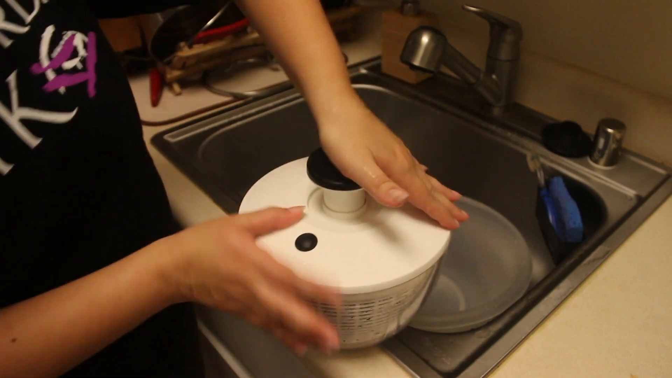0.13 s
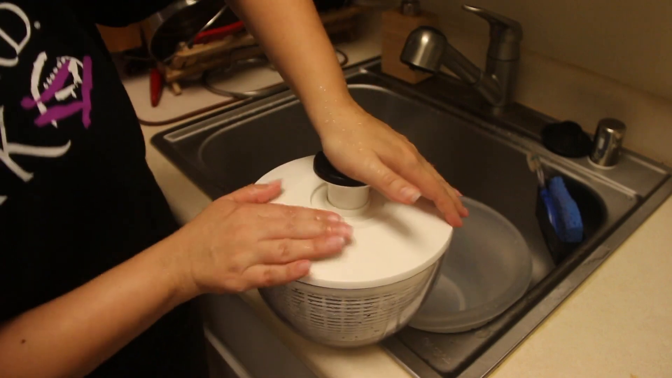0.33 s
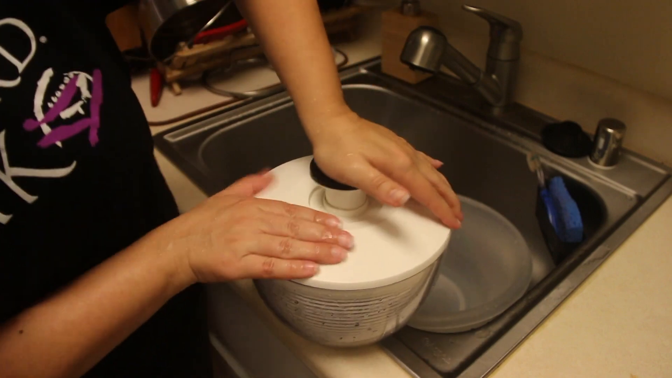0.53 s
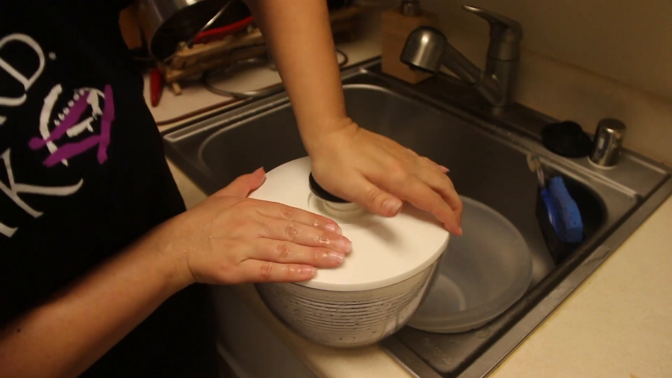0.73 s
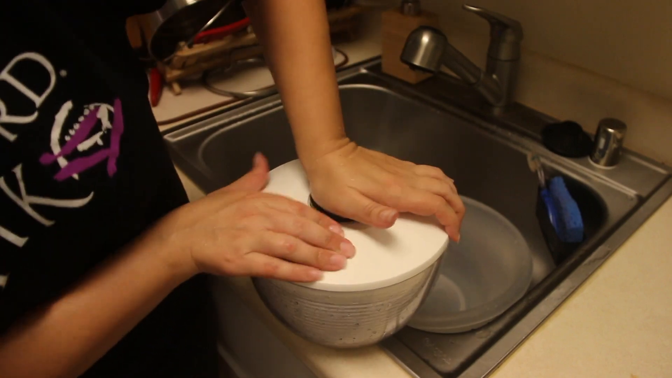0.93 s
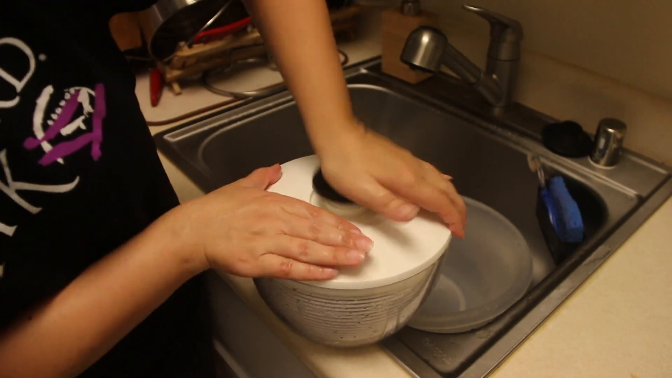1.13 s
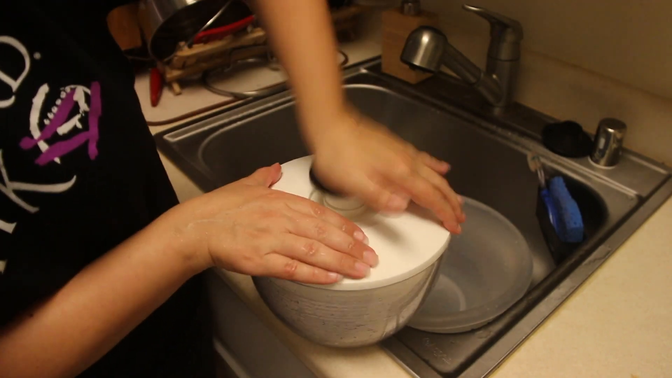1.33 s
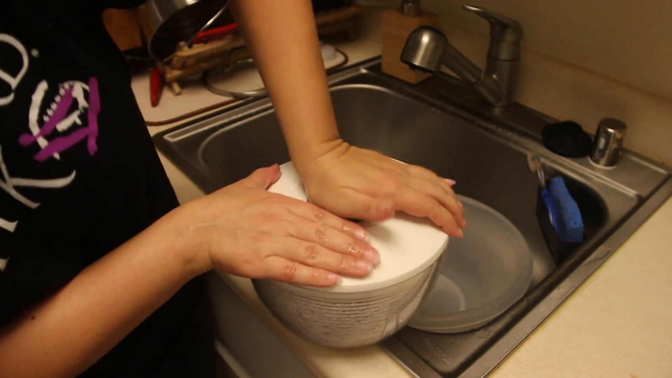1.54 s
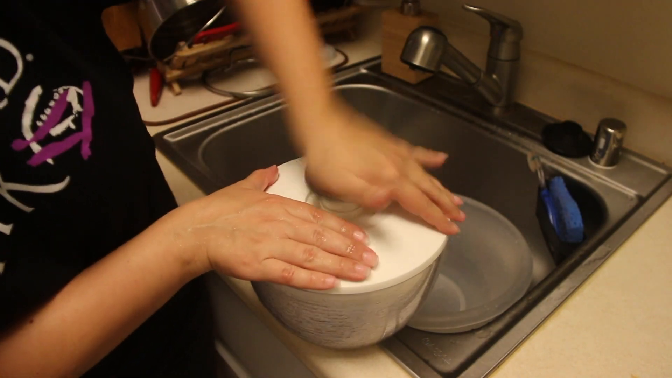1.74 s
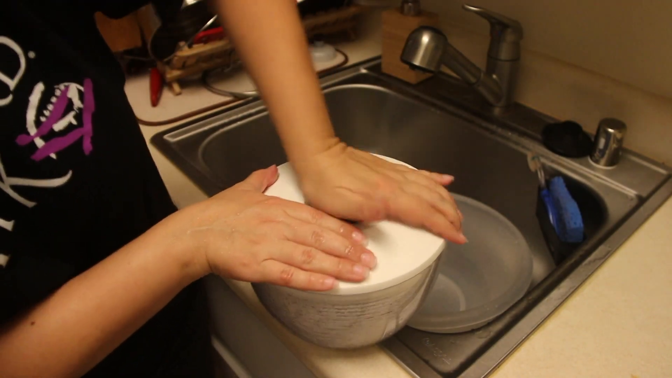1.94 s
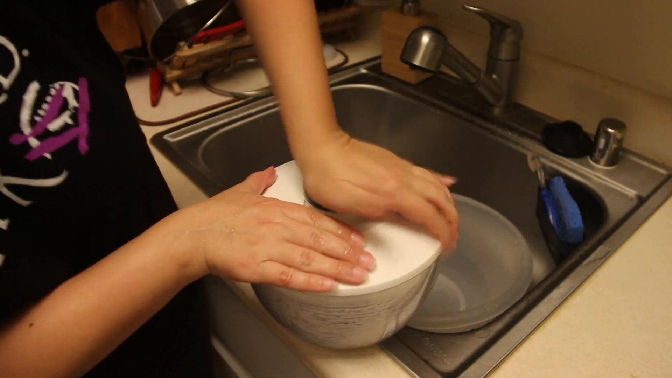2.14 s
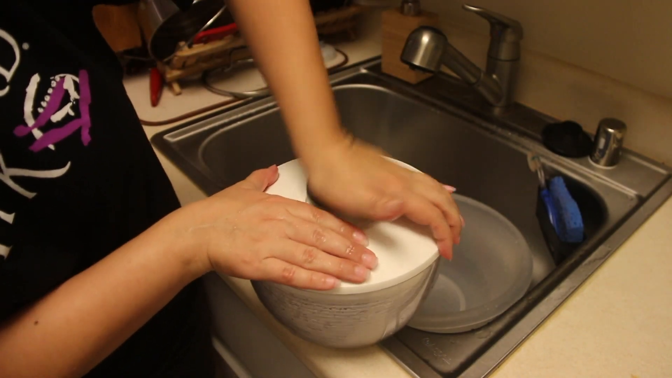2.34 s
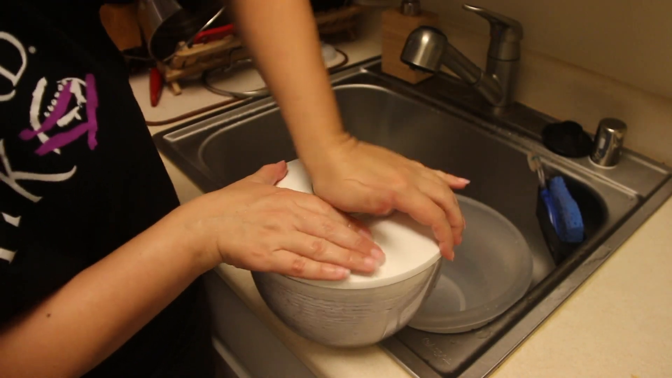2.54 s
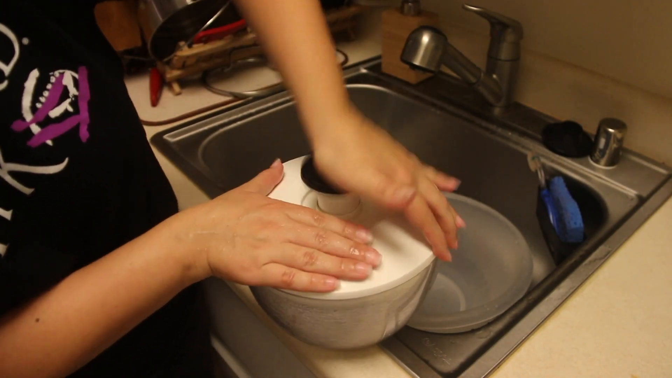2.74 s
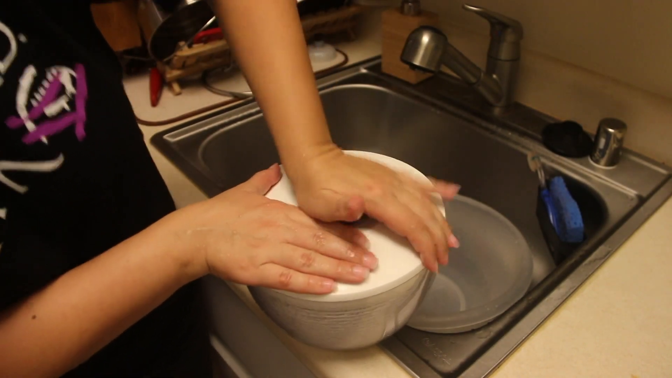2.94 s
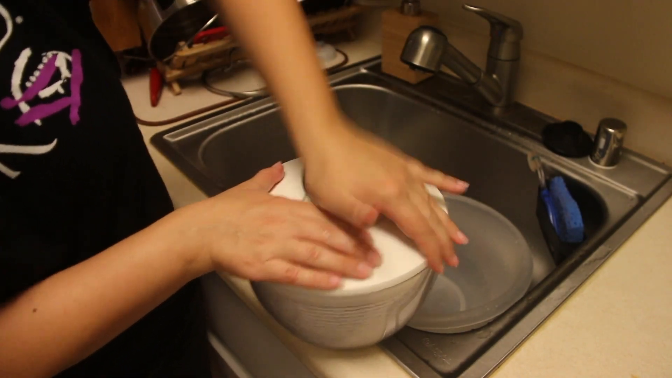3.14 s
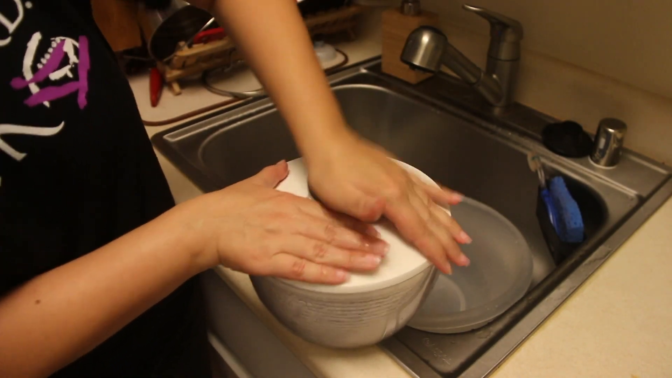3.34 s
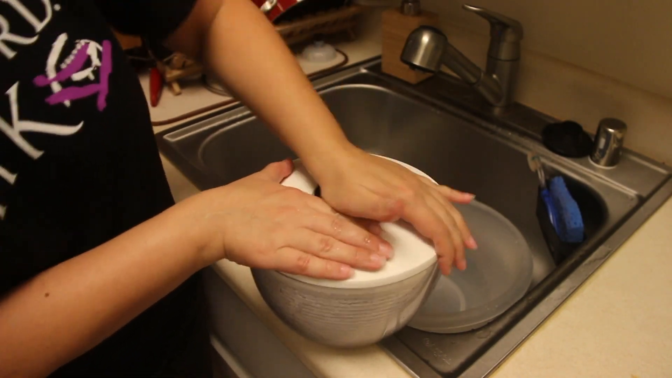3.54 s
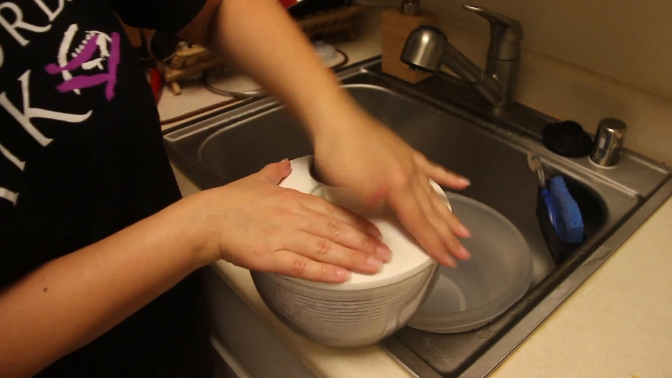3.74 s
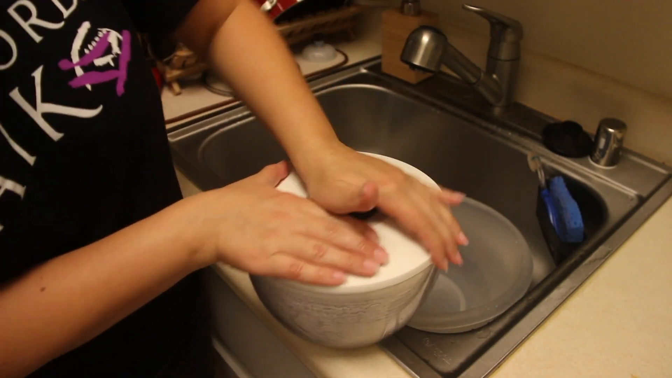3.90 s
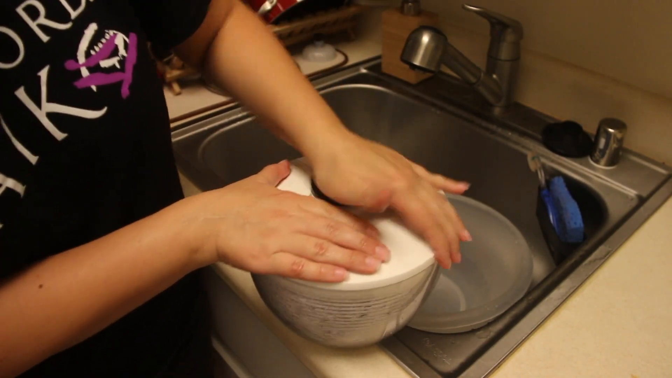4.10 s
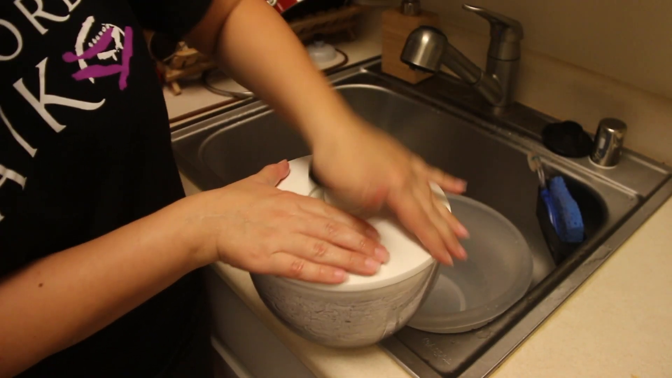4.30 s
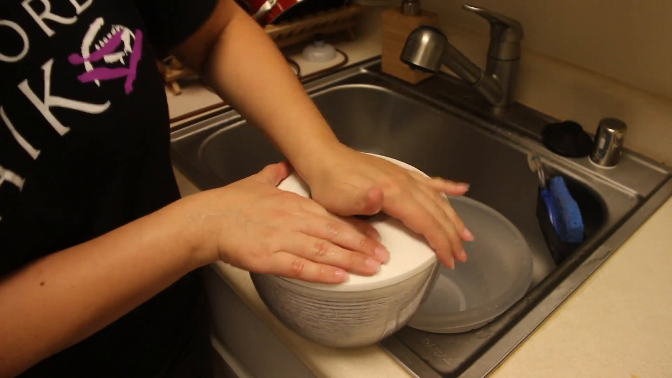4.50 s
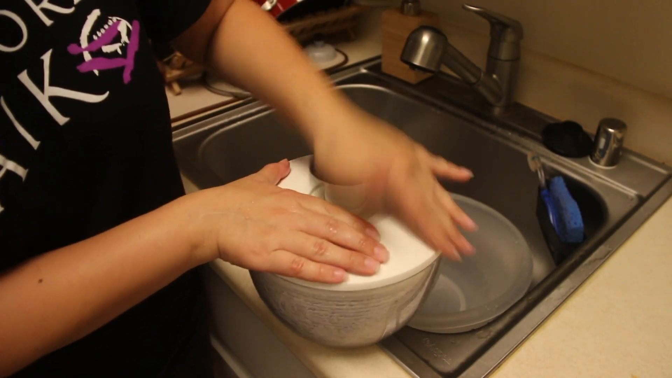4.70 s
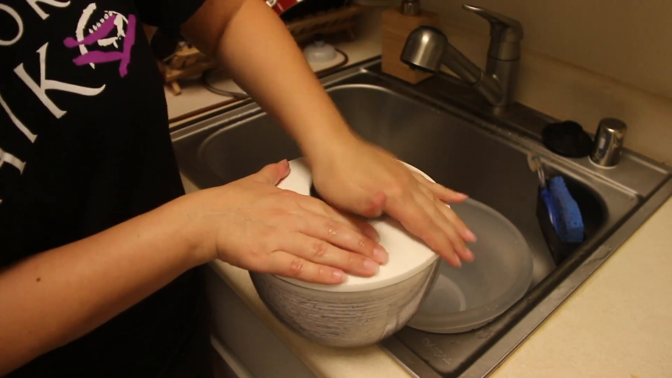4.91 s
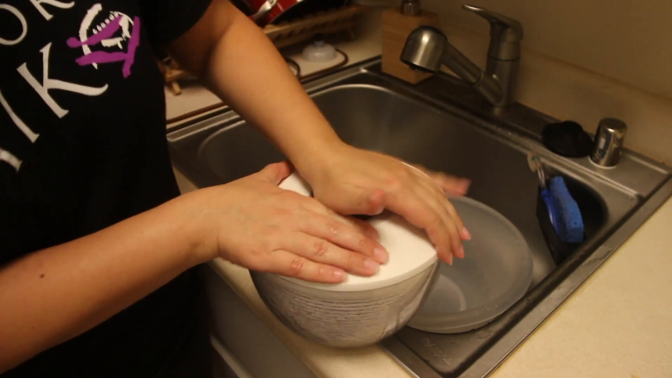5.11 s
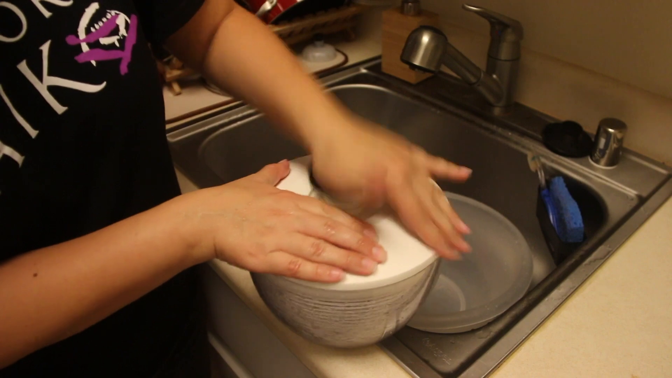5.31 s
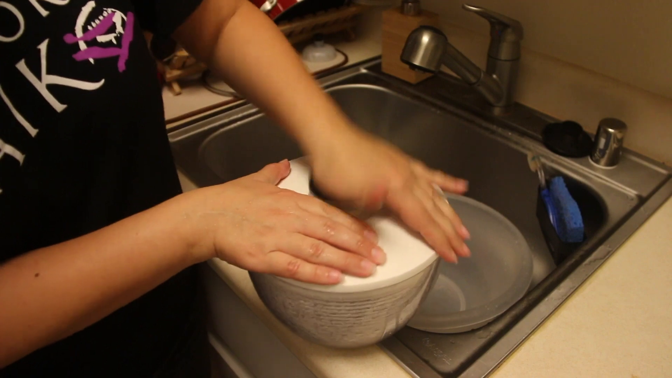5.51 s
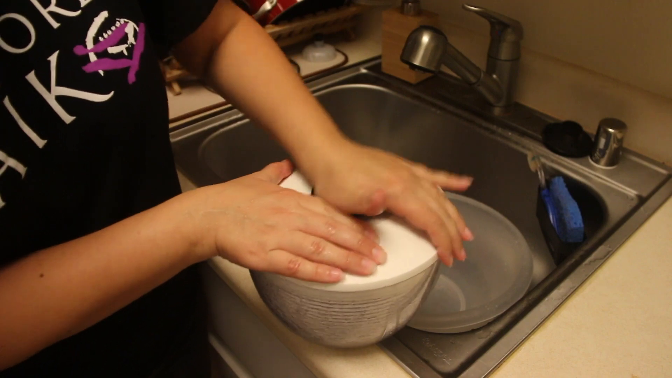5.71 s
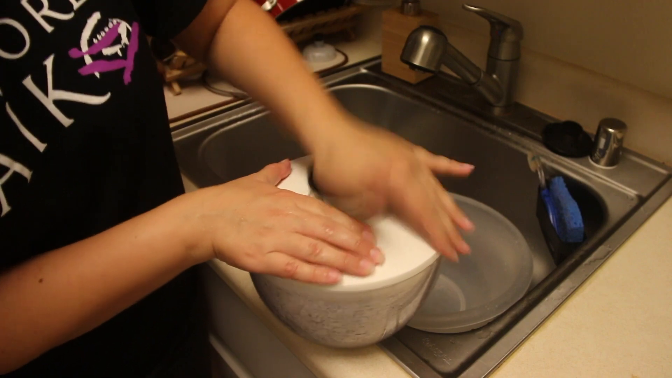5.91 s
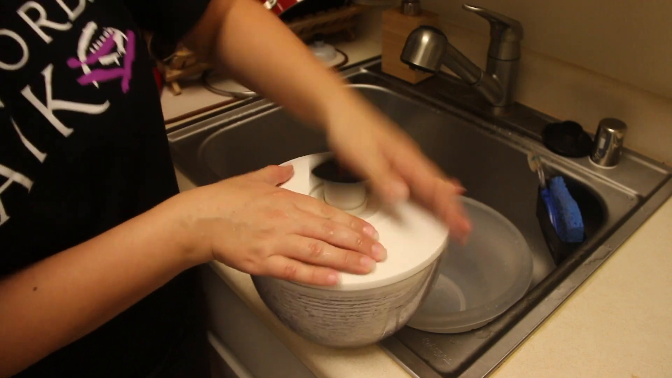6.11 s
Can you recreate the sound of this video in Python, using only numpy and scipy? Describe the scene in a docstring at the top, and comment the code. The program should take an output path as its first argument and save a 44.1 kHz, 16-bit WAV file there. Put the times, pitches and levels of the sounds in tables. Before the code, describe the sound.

For the first half second, hands brush faintly over a plastic lid and loose parts tick. After a light knock at about 0.8 seconds, the salad spinner starts being pumped at around 1 second. Each stroke is a quick cluster: the knob snaps up, the plunger scrapes down with a slightly squeaky rasp, the mechanism catches with a clack, and the plunger lands with a hollow thump through lid and bowl. The strokes quicken from about two and a half to just over three a second and grow louder. Underneath, the basket's grainy whirr and low hum build until about 4.5 seconds and then hold, swelling with each push and carrying a fine hiss of flung drops. From about 5 seconds, extra knocks make the clatter busier, and pumping continues to the end, just past 6 seconds. Everything is close and nearly centred, with a short kitchen echo.

```python
"""Hands brush a plastic lid and loose parts tick, then a salad spinner is pumped in quickening strokes.
On each stroke the knob snaps up, the plunger scrapes down its sleeve, the clutch catches and the
plunger hits bottom. Every contact chatters through the thin shell and makes the lid and bowl boom.
Underneath, the basket whirrs louder and louder, wobbling and flinging drops,
and a small, hard kitchen adds a short tail."""
import sys
import numpy as np
from scipy import signal
from scipy.fft import rfft, irfft, next_fast_len
from scipy.io import wavfile
from scipy.ndimage import uniform_filter1d

SR = 44100
rng = np.random.default_rng(int(sys.argv[2]) if len(sys.argv) > 2 else 0)


def wav_record(signal):
    """Record a signal, one row per channel, as 16-bit PCM in the file named by sys.argv[1]."""
    frames = np.transpose(np.atleast_2d(signal))
    bounded = np.clip(frames, -1, 1)
    # unit amplitude maps onto the largest positive 16-bit level
    quanta = np.round(bounded * 32767).astype(np.int16)
    wavfile.write(sys.argv[1], SR, quanta)


N = 271347
T = np.arange(5120) / SR  # time axis of one knock
TAIL_FADE = np.cos(np.pi / 2 * T / T[-1])

# Fader ride of the hands on the lid: time_s, level_db
PALM_RIDE = [(0, -54.5), (.12, -57), (.2, -52), (.3, -73), (.4, -80)]
# Fader rides of the spinning basket: time_s, whirr_db, hum_db, air_db
BASKET_RIDE = [(0.0, -51.5, -61, -57), (0.55, -52, -57, -61), (0.82, -46, -56.5, -54),
               (1.27, -39.5, -48, -43), (1.59, -38, -44, -47), (2.11, -37.5, -45, -42.5),
               (2.41, -34, -37.5, -44), (2.72, -32, -35.5, -44), (2.83, -32.5, -41, -42),
               (3.2, -33, -38, -43), (3.48, -31.5, -43.5, -39.5), (3.92, -30, -38, -39.5),
               (4.26, -31, -40, -39), (4.61, -29, -35, -38.5), (4.86, -28, -43, -40.5),
               (5.31, -30, -33.5, -38), (6.01, -28, -42, -41), (6.15, -31.5, -39, -35)]
# Basket layers, in the order rumble, hum, rattle, spray:
STEADY_TRIM_DB = [-7, -3.5, -8.5, -4]  # trim_db on the ride
WOBBLE_TRIM_DB = [-21, -22.5, -21.5, -16]  # trim_db on the wobble
WOBBLE_PEAK_S = [0.023, 0.068, 0.03, 0.013]  # rise_s of the wobble

# Tone curves: frequency_hz, relative_db
PALM_EQ = [(590, -53), (1000, -29), (1530, -4), (1730, -20), (2520, -2), (2730, -7), (3500, -13),
           (5000, -22), (6500, -50), (11000, -120)]  # skin rubbing plastic
RUMBLE_EQ = [(12, -52), (20, -24), (54, -9), (140, 7), (291, -2.5), (358, 7), (410, -8), (475, -7),
             (536, 0), (631, -32), (700, -28), (910, -70), (1540, -120)]  # bearing
HUM_EQ = [(250, -10.5), (335, 3), (358, 4.5), (368, 12), (380, -13.5), (410, 2.5), (520, -41)]  # humming bowl
RATTLE_EQ = [(320, -24), (550, 5), (636, 1), (736, 9.5), (824, 2), (1080, -4.5), (1360, -1.5), (1760, 1.5),
             (1870, 0), (3800, -26), (4940, -58), (8360, -120)]  # rattling basket
SPRAY_EQ = [(1940, 0.5), (3300, 6.5), (4210, 0), (5790, -1.5), (7590, -9.5), (10200, -13.5), (15100, -20),
            (16000, -35)]  # air and drops
ROOM_TONE_EQ = [(12, -38), (20, 9), (150, -13), (262, 4), (347, -39.5), (459, 9), (527, -1), (1060, 2),
                (1660, 0), (2080, -61), (2460, -10), (14700, -18), (16000, -41)]  # still kitchen
SHELL_EQ = [(450, -19.5), (880, -1.5), (1500, -5.5), (2060, -2), (2720, -5), (3170, -4), (3340, -9),
            (4200, -11.5), (5460, -23), (9240, -120)]  # thin walls
TICK_EQ = [(4000, -14), (6800, -2.5), (10100, -4), (12100, -12.5), (15200, -16), (16000, -30)]  # hard edges touching
SLEEVE_EQ = [(2290, -5), (3900, -0.5), (4300, -12), (4750, 0), (5360, 1.5), (7200, -11.5), (9360, -25),
             (15800, -120)]  # rasp of the plunger sleeve
LID_EQ = [(260, -40.5), (450, -3.5), (641, -9), (741, 4), (913, -6), (1520, -1.5), (1800, -13.5),
          (2340, -72), (3960, -120)]  # dense small modes of the lid
REVERB_EQ = [(60, 6), (250, -12), (600, 1), (2000, -2.5), (15000, -4)]  # reflected sound
WIDTH_EQ = [(60, -27), (130, -30), (290, -24), (640, -14.5), (1410, -11.5), (3100, -4), (6820, 1),
            (15000, -0.5)]  # side channel of diffuse sound

# Resonances of shell, lid and bowl: pitch_hz, relative_db, t60_s
SHELL_MODES = [(1730, -3, 0.021), (1920, 15, 0.018), (2350, 10, 0.022), (3130, -9, 0.013),
               (3320, -21, 0.013)]
LID_MODES = [(507, 3, 0.15), (595, 23, 0.021), (646, 10.5, 0.016), (714, 17, 0.25), (843, 28, 0.012),
             (1006, 8, 0.061), (1070, 48, 0.027), (1225, -12, 0.072), (1297, 31, 0.1), (1380, -2, 0.1),
             (1590, 13, 0.15), (1760, -26, 0.033)]
BOWL_HIGH_MODES = [(272.5, -11.5, 0.16), (350, -5, 0.062), (362, -3.5, 0.13), (404, 2, 0.063),
                   (411, -18.5, 0.03), (520, -1, 0.023)]
BOWL_LOW_MODES = [(135, 15.5, 0.15), (156, 0, 0.096), (224, 27, 0.11)]
# Decay of the kitchen: frequency_hz, t60_s
ROOM_DECAY = [(100, 0.59), (400, 0.1), (1500, 0.22), (5000, 0.24), (13000, 0.25)]

# Knock cues, before trims: start_s, clack_db, rasp_db, squeak_hz, tick_db,
# attack_db (first contact over its rebounds), thud_db, ring_db, boom_db
LOOSE_KNOCKS = [(0.1426, -40, -61, 4290, -60, 2, -38, -34.5, -41),
                (0.1835, -33, -54, 6250, -63, -1, -48, -54, -49),
                (0.2329, -38, -48, 4300, -68, -8, -64, -43, -51),
                (0.2509, -39, -59, 4570, -66, 2, -42.5, -35, -42),
                (0.3366, -52, -62, 4420, -66, 0, -61, -65, -35),
                (0.3541, -44, -55, 4200, -75, -7, -65, -52, -50),
                (0.4205, -58, -67, 5350, -69, 12, -68, -63, -40),
                (0.8155, -31, -48, 4200, -51, -5, -40, -45, -40),
                (0.9494, -38, -58, 5610, -63, -6, -46, -54, -43),
                (1.0475, -35, -52, 4590, -65, -2, -44, -38, -41),
                (1.0792, -36, -58, 4330, -69, -7, -57, -46, -48),
                (1.1268, -39, -41, 5000, -52, 0, -60, -37, -42),
                (1.3114, -32, -39, 4640, -67, -7, -38, -39, -47),
                (1.713, -25, -28.5, 5500, -39, -6, -33, -26.5, -28),
                (1.7503, -37, -35, 4780, -39, 3, -37, -27.5, -26),
                (2.0144, -31, -43, 5210, -54, 3, -34, -31, -37),
                (2.3436, -26, -45, 5000, -55, 2, -28, -27.5, -33),
                (2.7162, -31, -32, 5230, -56, 6, -35, -30, -43),
                (3.1023, -33, -31, 5100, -41, 9, -46, -39, -45),
                (3.3424, -25.5, -45, 5000, -52, -16, -32, -39, -40),
                (3.487, -18, -27, 4830, -30, -7, -26.5, -27, -36),
                (3.9823, -32, -38, 5510, -49, 0, -35, -41, -43),
                (4.2714, -20, -46, 4360, -43, -10, -33, -25, -18.5),
                (4.6189, -39, -45, 5350, -51, 5, -37, -41, -33),
                (4.8968, -20.5, -49, 4640, -41.5, -3, -22.5, -43, -26),
                (5.014, -25, -47, 4900, -50, -7, -43, -29, -37),
                (5.1791, -18, -44, 4720, -58, 1.5, -23.5, -30, -23),
                (5.2131, -20, -46, 4700, -59, 1, -32.5, -19.5, -42),
                (5.2794, -22, -44, 5070, -48, -1, -35, -32, -25),
                (5.5129, -19.5, -48, 4640, -50, -1, -33, -22, -36),
                (5.6614, -13, -29, 4100, -29.5, -2, -28, -19.5, -16.5),
                (5.6859, -21, -41, 5170, -48, -4, -26, -26, -17),
                (5.8965, -20, -36.5, 4860, -50, 0, -27, -48, -41)]  # lid and basket knock about
KNOB_STOPS = [(0.9946, -25, -39, 4400, -48.5, -3, -33, -23.5, -27.5),
              (1.5783, -21, -39, 4230, -48, -3, -30, -24.5, -22.5),
              (1.9525, -17.5, -37, 4400, -46, -5.5, -27.5, -24, -22),
              (2.2852, -22, -38, 4320, -47, -5.5, -27, -22.5, -29),
              (2.6559, -18, -34, 4450, -42, -3.5, -36, -22.5, -21.5),
              (2.9971, -16, -32, 4250, -36, -1, -48, -19, -19),
              (3.2899, -17.5, -37, 4440, -41, -3.5, -25, -21, -25),
              (3.5628, -16, -38, 4270, -42, -4, -24, -37, -34),
              (3.91, -17.5, -34, 4500, -40, 0, -26, -18.5, -23.5),
              (4.2318, -18.5, -32, 4700, -46, -7, -24, -18, -20),
              (4.5481, -15, -33, 4380, -36.5, 2.5, -42, -16.5, -20),
              (4.8623, -15, -38, 4760, -51, -2, -28, -27, -31),
              (5.1492, -15.5, -31, 4580, -54, -3, -42, -16, -20),
              (5.466, -15.5, -32, 4730, -41, -8, -35, -21, -21),
              (5.7688, -18.5, -33, 4700, -38, -4, -23, -22, -22),
              (6.0611, -13.5, -37, 4400, -40, -2, -20.5, -24, -19)]  # the knob springs up against its stop
SCRAPES = [(1.1783, -32.5, -39, 5000, -50, -4, -48, -44, -57),
           (1.6422, -18, -23, 5100, -51, -3, -54, -38, -41),
           (2.0318, -21, -25, 5240, -48, -2, -33, -34, -41),
           (2.3855, -24.5, -26.5, 5250, -38, -3.5, -44, -29, -36),
           (2.7288, -20.5, -30.5, 5300, -56, -6.5, -46, -44, -41),
           (3.047, -20, -32, 5470, -44, -6, -22, -16, -29),
           (3.3738, -22, -30.5, 5400, -55, -5, -39, -42, -35),
           (3.6578, -23, -33.5, 6800, -47, -2, -43, -45, -51),
           (4.0084, -25, -34, 5290, -46, -4, -29, -30, -26),
           (4.3164, -26.5, -32, 4320, -49, -9, -49, -43, -36),
           (4.6398, -23.5, -30.5, 6240, -48, -10, -40, -44, -31),
           (4.9566, -26, -33, 6040, -53, -5, -46, -49, -48),
           (5.2451, -24, -28, 6030, -43, -3, -41, -29, -41),
           (5.5453, -21, -32, 4630, -48, 0, -27, -42, -30),
           (5.876, -34, -31.5, 5290, -47, -7, -40, -34, -28),
           (6.123, -19, -26, 4440, -40, -14, -35, -27, -24)]  # the plunger starts down its sleeve
CLUTCH_CATCHES = [(1.2394, -24, -27, 4560, -41, -5.5, -46, -41, -39),
                  (1.705, -22, -33, 5440, -45, -2.5, -25, -13.5, -16.5),
                  (2.111, -19, -22.5, 4250, -29.5, 0.5, -44, -53, -50),
                  (2.4546, -13.5, -23.5, 5760, -34.5, -3, -36, -17, -24),
                  (2.7948, -22, -30, 4840, -37, -5, -27.5, -13, -23),
                  (3.123, -21.5, -22.5, 4900, -33.5, -7.5, -51, -18.5, -22.5),
                  (3.4408, -26, -29.5, 4700, -37, -10.5, -33, -23, -25.5),
                  (3.7352, -17.5, -30, 5900, -35, -6.5, -21.5, -11.5, -20.5),
                  (4.0712, -26, -23.5, 5070, -34.5, -4, -55, -57, -49),
                  (4.3854, -16, -31.5, 4370, -34.5, -12, -24.5, -15, -22),
                  (4.7135, -8, -25.5, 5570, -29.5, -1.5, -11, -8, -22.5),
                  (5.029, -21, -28.5, 5020, -33, 0, -30, -36, -40),
                  (5.3124, -17.5, -28, 5270, -32.5, 0, -23.5, -13, -18.5),
                  (5.6111, -9.5, -22.5, 5600, -28, 2, -7, -11.5, -32),
                  (5.9361, -31, -29.5, 6200, -33, -3.5, -27, -40, -35)]  # the clutch grabs the basket
BOTTOM_HITS = [(1.2679, -36, -43, 4400, -55, 10, -19.5, -17.5, -30, 0.012, -31),
               (1.3847, -14, -26.5, 4500, -38, -1.5, -16.5, -14.5, -49, 0.011, -23.5),
               (1.7756, -14, -24, 5200, -29, -24, -21, -28, -23, 0.02, -20),
               (2.1648, -12, -27, 5440, -31.5, -4.5, -14, -15.5, -33, 0.0097, -19),
               (2.5149, -20.5, -17, 4800, -29, -1, -23, -26, -25, 0.01, -16.5),
               (2.8517, -12, -22.5, 4360, -28.5, -3.5, -16, -19.5, -26, 0.0095, -23),
               (3.1819, -16, -27.5, 5100, -32, -7, -17, -19.5, -20.5, 0.014, -16.5),
               (3.501, -12, -35, 5660, -32.5, -7, -13.5, -16.5, -29, 0.012, -13),
               (3.8015, -15, -25.5, 5800, -27, -6.5, -20, -19, -19, 0.017, -12.5),
               (4.1224, -14, -26, 4960, -28.5, -7.5, -19, -15.5, -28, 0.0088, -15.5),
               (4.4392, -11, -37, 5200, -30, -5, -20, -12.5, -15, 0.012, -16.5),
               (4.768, -12, -37, 5280, -29, -7, -14.5, -21.5, -15.5, 0.0077, -17.5),
               (5.0668, -15, -19, 5220, -26.5, -1.5, -17.5, -15.5, -10, 0.013, -11),
               (5.354, -13, -35, 4420, -36.5, -16, -26, -32, -14.5, 0.018, -17.5),
               (5.676, -11, -27, 5180, -29.5, -5.5, -19.5, -14, -12.5, 0.023, -16),
               (5.9534, -15.5, -30, 4200, -51, -13, -15, -28, -13, 0.0075, -19.5)]  # the plunger lands; adds jolt_chatter_s, wobble_db
CUE_LISTS = [KNOB_STOPS, SCRAPES, CLUTCH_CATCHES, BOTTOM_HITS, LOOSE_KNOCKS]
# How the shell clacks, a row per cue list: shell_trim_db, chatter_s
CLACK_VOICING = [(-3.5, 0.0098), (-5.5, 0.012), (-6, 0.028), (-5, 0.015), (-6, 0.011)]
# How the bowl is jolted, a row per cue list:
# delay_s, low_trim_db, chatter_s, attack_trim_db, boom_delay_s, boom_hz, boom_t60_s
JOLT_VOICING = [(0, 14, 0.022, 3.5, 0.0032, 155.5, 0.046), (0.0018, -6, 0.01, 6.5, 0.006, 142, 0.076),
                (0.000099, -25, 0.033, 2.5, 0.005, 153, 0.2), (.004, 1, 0.022, -6.5, 0.0123, 160, 0.095),
                (0, 4, 0.032, -4.5, 0.0029, 159, 0.048)]


def gain_of(db):
    """Decibels to gain."""
    return 10 ** (np.asarray(db) / 20)


def unit_rms(x):
    """Scales to an rms of 1."""
    return x / np.sqrt(np.mean(x ** 2) + 1e-20)


def curve_at(curve, hz):
    """Reads a curve on a log-frequency axis."""
    points_hz, values = np.transpose(curve)
    return np.interp(np.log(hz + 1), np.log(points_hz + 1), values)


def equalise(x, curve):
    """Shapes a sound with a tone curve."""
    size = next_fast_len(x.shape[-1])
    gains = gain_of(curve_at(curve, np.fft.rfftfreq(size, 1 / SR)))
    return irfft(rfft(x, size) * gains, size)[..., :x.shape[-1]]


def place(track, start_s, sound):
    """Drops a sound onto a track."""
    part = track[round(start_s * SR):][:len(sound)]
    part += sound[:len(part)]


def spread(mid, side):
    """Left and right from two unlike signals; the bass stays centred."""
    side = equalise(side, WIDTH_EQ)
    return np.array([mid + side, mid - side])


def contacts(shape, per_s):
    """Tiny impacts at random times and strengths."""
    return rng.standard_normal(shape) * (rng.random(shape) < per_s / SR)


def ring(modes, uneven_db):
    """Dying modes, rebalanced each time by where the blow lands."""
    hz, db, t60_s = np.transpose(modes)[:, :, None]
    db = db + uneven_db * rng.standard_normal(db.shape)
    polarity = rng.choice([-1, 1], db.shape)
    return (polarity * gain_of(db - 60 * T / t60_s) * np.sin(2 * np.pi * hz * T)).sum(0)


def damped_body(curve):
    """Many heavily damped modes merge into one short pulse with this tone."""
    db = np.maximum(curve_at(curve, abs(np.fft.fftfreq(8192, 1 / SR))), -100)
    minimum_phase = np.exp(np.conj(signal.hilbert(np.log(gain_of(db)))))
    return unit_rms(np.fft.ifft(minimum_phase).real[:len(T)])


def chatter(length_s, per_s, attack_db):
    """One contact, then a cluster of rebounds that builds more slowly after a soft first touch."""
    rise = 1 - np.exp(-T / (0.00022 * gain_of(-attack_db)))
    fall = np.exp(-(T / np.clip(length_s, .002, .05)) ** 2)
    hits = contacts(len(T), per_s) * rise * fall
    hits[0] = gain_of(attack_db) * np.linalg.norm(hits) + 1e-6
    return hits


def strike(hits, body, db):
    """Contacts ring a body; the loudest few milliseconds set the level."""
    sound = irfft(rfft(hits, 8192) * rfft(body, 8192))[:len(T)] * TAIL_FADE
    peak_power = uniform_filter1d(sound ** 2, size=200).max()
    return gain_of(db) * sound / np.sqrt(2 * peak_power)


def palm_rub():
    """Hands slide over the lid with a soft hiss."""
    time_s, db = np.transpose(PALM_RIDE)
    rub = unit_rms(equalise(rng.standard_normal((2, N)), PALM_EQ))
    return spread(*rub * gain_of(np.interp(np.arange(N) / SR, time_s, db)))


def room_tone(level_db=-58.5):
    """The steady hush of the kitchen."""
    hush = unit_rms(equalise(rng.standard_normal((2, N)), ROOM_TONE_EQ))
    return gain_of(level_db) * spread(*hush)


def basket_whirr():
    """A grainy bed: bearing rumble, bowl hum, uneven basket contacts, air and flung drops."""
    time_s, whirr_db, hum_db, air_db = np.transpose(BASKET_RIDE)
    t, out = np.arange(N) / SR, np.zeros((2, N))
    layers = [(RUMBLE_EQ, whirr_db, 700, 2.5, 2.2), (HUM_EQ, hum_db, 700, 2.5, 1.2),
              (RATTLE_EQ, whirr_db, 2500, 2.5, 1.8), (SPRAY_EQ, air_db, 9000, 1.2, 1.8)]
    for i, (curve, ride_db, per_s, accent_db, flutter_db) in enumerate(layers):
        accents = gain_of(accent_db * np.minimum(rng.exponential(1, N), 3.5))
        grains = rng.standard_normal((2, N)) * accents * (rng.random(N) < per_s / SR)
        drive = unit_rms(grains) + 0.71 * rng.standard_normal((2, N))
        drift = uniform_filter1d(uniform_filter1d(rng.standard_normal(N), size=900), size=900)
        flutter = gain_of(flutter_db * unit_rms(drift))
        steady = gain_of(np.interp(t, time_s, ride_db) + STEADY_TRIM_DB[i])
        wobble = gain_of(WOBBLE_TRIM_DB[i]) * basket_wobble(WOBBLE_PEAK_S[i])
        out += unit_rms(equalise(drive, curve)) * (steady + wobble) * flutter
    return spread(*out)


def basket_wobble(peak_s):
    """Envelope for the whirr: each bottom hit shakes the basket in a swell that rises and settles."""
    out, age = np.zeros(N), np.arange(SR // 2) / SR / peak_s
    for start_s, *_, wobble_db in BOTTOM_HITS:
        place(out, start_s, gain_of(wobble_db) * age * np.exp(1 - age))
    return out


def plastic_clacks(squeak_t60_s=0.0069):
    """Contacts ring the faintly pitched shell, tick on hard edges and rasp the squeaky sleeve."""
    out = np.zeros(N)
    walls, rasp, edge = damped_body(SHELL_EQ), damped_body(SLEEVE_EQ), damped_body(TICK_EQ)
    for cues, (shell_trim_db, chatter_s) in zip(CUE_LISTS, CLACK_VOICING):
        for start_s, clack_db, rasp_db, squeak_hz, tick_db, attack_db, *_ in cues:
            hits = chatter(chatter_s, 4000, attack_db)
            sleeve = rasp + 0.77 * unit_rms(ring([(squeak_hz, 0, squeak_t60_s)], uneven_db=0))
            shell = walls + 0.24 * unit_rms(ring(SHELL_MODES, uneven_db=7.5))
            place(out, start_s, strike(hits, shell, clack_db + shell_trim_db))
            place(out, start_s, strike(chatter(chatter_s, 9800, attack_db - 5), edge, tick_db))
            rubs = chatter(0.92 * chatter_s, 6000, attack_db - 0.5)
            place(out, start_s, strike(rubs, sleeve, rasp_db))
    return out


def bowl_booms():
    """The weight under each clack: jolts ring lid and bowl, and rocking swells one low note."""
    out, lid_body = np.zeros(N), damped_body(LID_EQ)
    for cues, voicing in zip(CUE_LISTS, JOLT_VOICING):
        delay_s, low_trim_db, chatter_s, attack_trim_db, boom_delay_s, boom_hz, boom_t60_s = voicing
        swell = (1 - np.exp(-T / 0.0031)) * gain_of(-60 * T / boom_t60_s) * TAIL_FADE
        swell /= swell.max()
        for start_s, _, _, _, _, attack_db, thud_db, ring_db, boom_db, *extra in cues:
            hits = chatter(extra[0] if extra else chatter_s, 1500, attack_db + attack_trim_db)
            lid = lid_body + 0.45 * unit_rms(ring(LID_MODES, uneven_db=2))
            thud = strike(hits, lid, thud_db)
            highs = strike(hits, ring(BOWL_HIGH_MODES, uneven_db=0.62), ring_db)
            lows = strike(hits, ring(BOWL_LOW_MODES, uneven_db=1.4), thud_db + low_trim_db - 8.5)
            place(out, start_s + delay_s, thud + highs + lows)
            boom = swell * np.sin(2 * np.pi * (boom_hz * T + rng.random()))
            place(out, start_s + boom_delay_s, gain_of(boom_db) * boom)
    return out


def kitchen_reverb(knocks, crossfade_hz=2.3):
    """Dense reflections die band by band; three tails crossfade so no fixed pitch rings out."""
    taps = contacts((6, SR // 2), per_s=0.12 * SR)  # three mid tails, three side tails
    hz, t, bands = signal.stft(taps, SR, nperseg=256)
    decay = gain_of(-60 * t / curve_at(ROOM_DECAY, hz)[:, None])
    tails = signal.istft(bands * decay, SR, nperseg=256)[1]
    tails /= np.linalg.norm(tails, axis=1)[:, None]
    tails = np.pad(tails, ((0, 0), (130, 0)))  # 3 ms pre-delay from the nearest wall
    turn = 2 * np.pi * (crossfade_hz * np.arange(N) / SR + np.arange(3)[:, None] / 3)
    sends = np.tile(knocks * np.cos(turn) * np.sqrt(2 / 3), (2, 1))  # constant-power crossfade
    wet = equalise(signal.oaconvolve(sends, tails, axes=1)[:, :N], REVERB_EQ)
    return spread(wet[:3].sum(0), gain_of(3.5) * wet[3:].sum(0))


def knob_snaps(trim_db=-4.5):
    """The knob meets its stop: two quick cycles of the stem over the slower recoil of the lid."""
    stem = np.exp(-T / 0.0003) * np.sin(2 * np.pi * 2400 * T)
    recoil = np.exp(-T / 0.0015) * np.sin(2 * np.pi * 500 * T)
    out, snap = np.zeros(N), stem + 0.53 * recoil
    for start_s, clack_db, *_ in KNOB_STOPS:
        place(out, start_s, gain_of(clack_db + trim_db) * snap / snap.max())
    return out


def plunger_swish(trim_db=-27.5, fade_s=0.0067):
    """The plunger rubs down its sleeve in tiny slips, from each scrape to the next bottom hit."""
    t, level = np.arange(N) / SR, np.zeros(N)
    ends_s = np.append(np.transpose(BOTTOM_HITS)[0], N / SR)
    for start_s, clack_db, *_ in SCRAPES:
        end_s = ends_s[ends_s > start_s][0]
        gate = np.clip(np.minimum(t - start_s, end_s - t) / fade_s, 0, 1)
        level += gain_of(clack_db + trim_db) * gate
    return level * unit_rms(equalise(contacts(N, per_s=5000), SLEEVE_EQ))


def scene():
    """The mix: knocks and their reverb up front, over whirr, hands and room tone."""
    low_cut = signal.butter(3, 105, "high", fs=SR, output="sos")  # the knocks carry little deep bass
    knocks = signal.sosfilt(low_cut, plastic_clacks() + bowl_booms() + knob_snaps() + plunger_swish())
    direct = knocks * gain_of([[.15], [-.15]])  # a hair left of centre
    return room_tone() + direct + kitchen_reverb(knocks) + basket_whirr() + palm_rub()


def record(dry):
    """A steep high cut takes off the very top."""
    high_cut = signal.firwin(511, 15850, window=("kaiser", 9), fs=SR)
    return signal.oaconvolve(dry, high_cut[None], "same")


dry = scene()
out = record(dry)
wav_record(out)
```